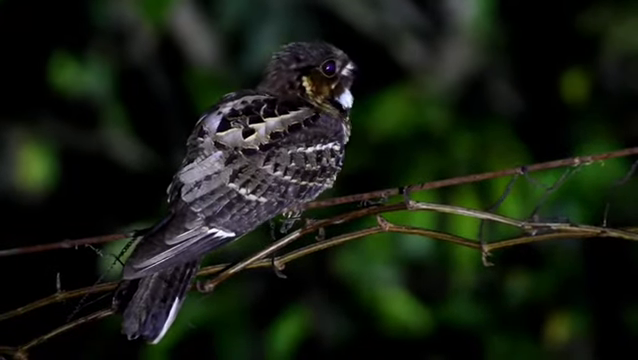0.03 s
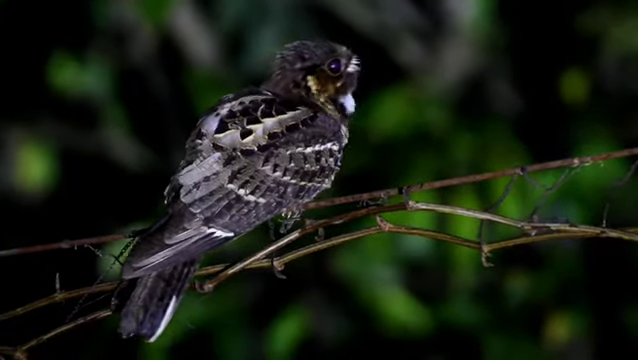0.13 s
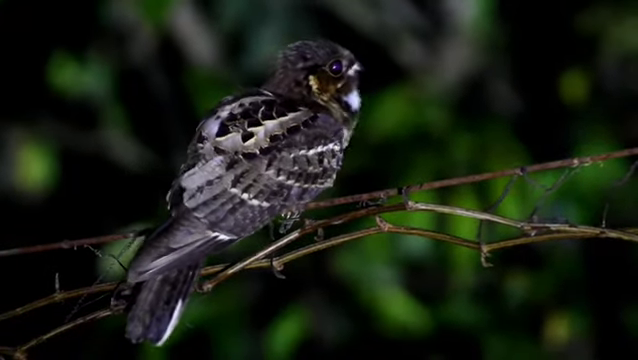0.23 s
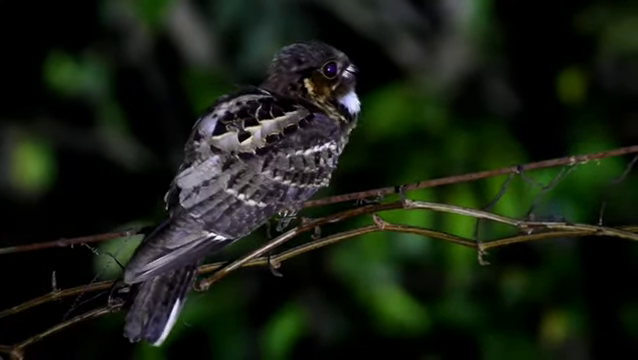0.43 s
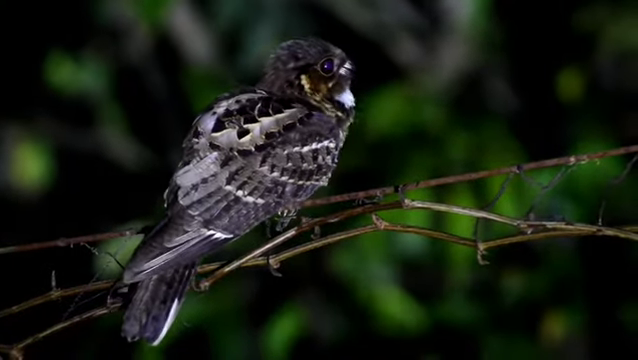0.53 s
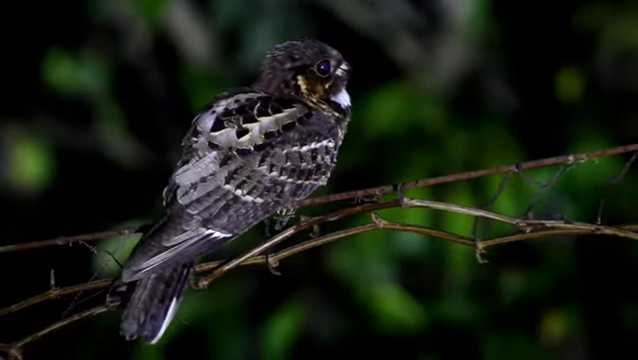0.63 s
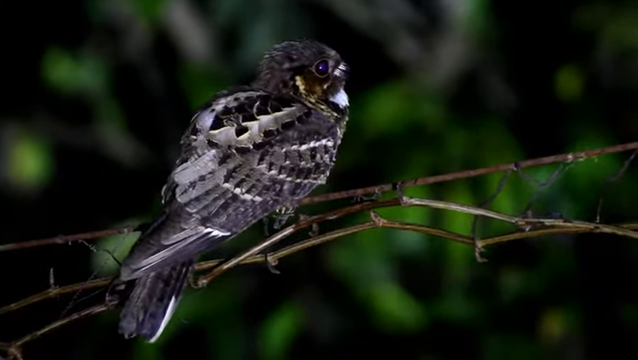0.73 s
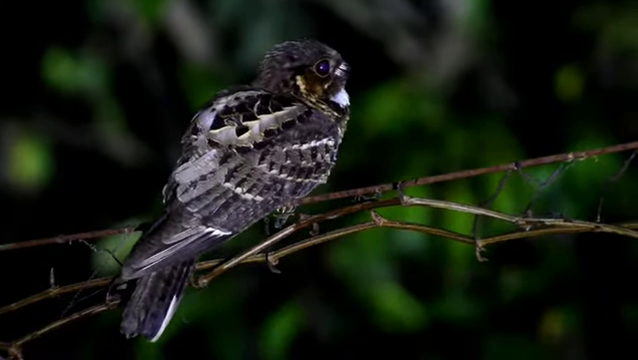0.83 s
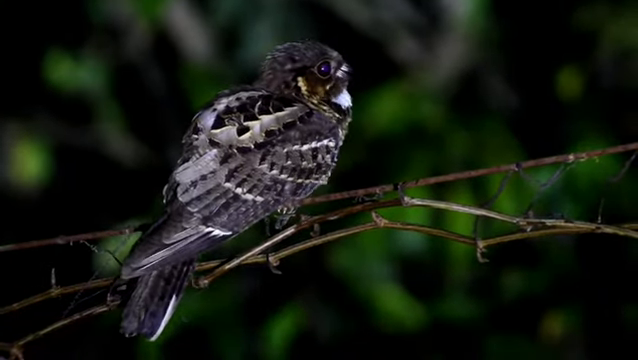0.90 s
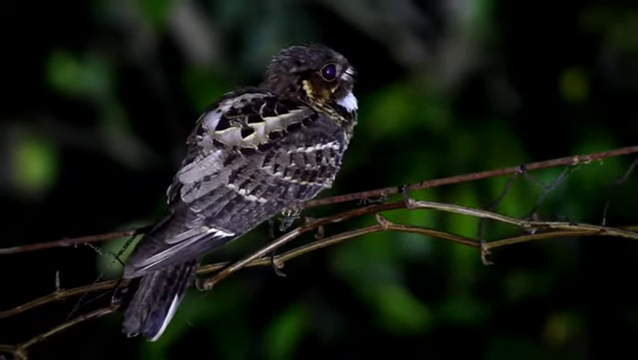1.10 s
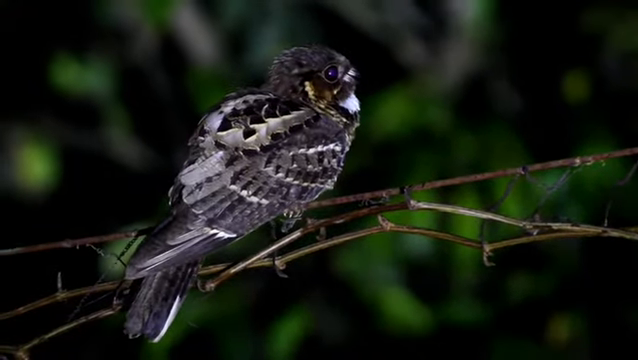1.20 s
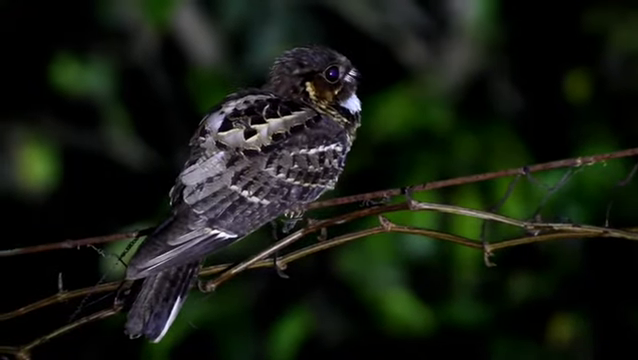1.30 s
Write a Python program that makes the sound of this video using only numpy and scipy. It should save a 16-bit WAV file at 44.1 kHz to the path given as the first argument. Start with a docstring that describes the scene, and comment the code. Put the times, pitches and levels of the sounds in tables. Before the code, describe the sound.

A nightjar on a branch gives one loud whistled note that drops quickly into three weaker wobbling swoops, echoing briefly among trees; high insects buzz and faint crickets trill throughout, with low rumble and microphone hiss.

```python
"""A nightjar gives one quavering whistle at night: a gliding tone with faint overtones rises loudly, then
makes three weaker swoops. Trees return it as delayed copies and a short tail of decaying noise.
Insects buzz in bands of noise, mostly falling in pitch; crickets trill lower, in pulsed noise.
A leaf rustles once, a decaying noise puff. Distant rumble and microphone hiss, shaped noise, lie under all,
with faint steady noise bands and, later, a low wavering hum."""
import sys
import numpy as np
from scipy import signal
from scipy.io import wavfile
from scipy.ndimage import uniform_filter1d

SR = 44100
rng = np.random.default_rng(int(sys.argv[2]) if len(sys.argv) > 2 else 0)


def how_loud(loudness_db):
    """Turn decibels into a plain amplitude multiplier (0 dB gives 1, 20 dB gives 10)."""
    steps = np.asarray(loudness_db, float) / 20
    return 10 ** steps


def transcribe(u):
    """Save the signal u as a 16-bit wav file named by the first command-line argument.

    u: samples, shape (n,) or (channels, n), limited to [-1, 1]; the rate is SR.
    q: integer samples, one column per channel.
    """
    v = np.clip(np.atleast_2d(u).T, -1, 1)
    q = np.round(v * 32767).astype(np.int16)
    wavfile.write(sys.argv[1], SR, q)


N = 59535
T_S = np.arange(N) / SR

# Background spectrum, relative density: f/Hz, level/dB
AIR_SPECTRUM = [(20, -35.5), (35, -13.5), (55, -6.5), (150, -6), (330, -4), (550, -3), (1000, -8),
                (1700, -12.5), (2800, -13), (4300, -11.5), (6600, -58), (7000, -24.5), (7500, -26),
                (8300, -22), (10000, -17), (16000, -20.5)]
# Distant rumble, only its swing about the mean counts: t/s, level/dB
RUMBLE_SWING = [(0.0, -61), (0.499, -61), (0.7, -61.5), (1.35, -60.5)]
# Left-right correlation of the background: f/Hz, correlation/1
AIR_LIKENESS = [(60, 0.46), (150, 0.22), (380, 0.58), (950, 0.073), (2380, -0.22), (5980, 0.029),
                (15000, 0.01)]
# Faint steady noise bands: centre f/Hz, width/Hz, level/dB rms
THIN_BANDS = [(2003, 7, -79.5), (6740, 540, -76.5), (7080, 200, -77.5)]
# Far, blurred chorus: t/s, level/dB rms
FAR_CHORUS_LEVEL = [(1.11, -53), (1.15, -55), (1.19, -51.5)]
# Single insect buzzes: start t/s, length/s, start f/Hz, end f/Hz, level at full swell/dB rms
INSECT_BUZZES = [(-.03, 0.13, 6010, 5444, -47.5), (.09, 0.098, 5290, 5100, -52.5),
                 (0.214, 0.11, 5880, 5550, -48), (0.319, .16, 6140, 5525, -50), (.6, 0.09, 5800, 5600, -50),
                 (0.679, 0.075, 5956, 6000, -48), (0.731, 0.073, 5710, 5550, -48),
                 (0.759, 0.071, 5410, 5074, -51), (0.831, 0.12, 5800, 5490, -50),
                 (0.976, .15, 6100, 5560, -50.5), (1.17, 0.046, 5700, 5870, -50),
                 (1.22, 0.071, 5620, 5450, -45.5), (1.276, 0.08, 5100, 5200, -57),
                 (1.296, 0.12, 6070, 5980, -49.5)]
# Wing strokes in a trill cycle: place/cycle, 1/e half-width of power/cycle, relative level/dB
WING_STROKES = [(.25, 0.069, -6), (0.621, .1, -2)]
# Whistle pitch: t/s, f/Hz
WHISTLE_PITCH = [(.235, 1335), (.241, 1385), (.248, 1422), (.258, 1473), (.266, 1495), (.273, 1500),
                 (.278, 1455), (.285, 1250), (.293, 985), (.302, 790), (.309, 695), (.318, 700),
                 (.327, 870), (.340, 1110), (.350, 1185), (.364, 1260), (.374, 1225), (.381, 1125),
                 (.390, 930), (.402, 735), (.409, 655), (.417, 645), (.427, 820), (.436, 970), (.449, 1130),
                 (.460, 1175), (.470, 1105), (.484, 850), (.495, 680), (.504, 655), (.512, 740),
                 (.519, 820), (.528, 810)]
# Whistle loudness: t/s, level/dB rms
WHISTLE_LEVEL = [(.235, -30), (.240, -27.5), (.247, -31), (.253, -26), (0.266, -23.5), (.277, -21),
                 (0.287, -24), (0.294, -31.5), (.304, -42.5), (0.314, -36), (.336, -44.5), (.356, -49),
                 (.378, -52), (0.39, -41), (.410, -39), (.428, -42), (.448, -48), (.460, -47), (.470, -52),
                 (0.482, -43), (0.498, -43), (.510, -50), (.518, -47), (.524, -51)]
# Overtones: t/s, second level/dB rms, second left over right/dB, third level/dB rms
LOW_OVERTONES = [(.236, -64, 2, -70), (.252, -60, 6, -63), (.266, -68, 9, -62), (.284, -74, 6, -63),
                 (.293, -70, 0, -80), (.310, -86, -4, -95), (.352, -62, -7, -95), (.366, -68, -6, -95),
                 (.377, -64, -8, -95), (.385, -86, 0, -95), (.437, -74, -4, -95), (.456, -66, -5, -95),
                 (.466, -66, -4, -95), (.474, -86, 0, -95)]
# Higher overtones: multiple/1, level over the third/dB
UPPER_OVERTONES = [(5, -12), (7, -9), (8, -10)]
# Near echoes from the trees: delay/s, level/dB, left over right/dB
TREE_ECHOES = [(.0075, -16, -13), (.019, -19.5, 15), (.031, -20, -1.5), (0.044, -16.5, 8.5), (.068, -26, 8),
               (0.097, -21.5, -7.5)]

AIR_DB_RMS, RUMBLE_TOP_HZ = -57.5, 806
AIR_DRIFT_DB, AIR_DRIFT_HZ = 2.05, 4.1
CHORUS_HZ, CHORUS_WIDTH_HZ, CHORUS_TOP_HZ = 5600, 960, 6200
BUZZ_WIDTH_HZ, BUZZ_EDGE_POWER, CHORUS_LEFT_DB = 394, 0.35, 1.3
TRILL_HZ, TRILL_WIDTH_HZ, TRILL_RATE_HZ = 3503, 420, 29
TRILL_DB_RMS, TRILL_LEFT_DB, TRILL_BLUR_DB = -64, 5, -4
RUSTLE_START_S, RUSTLE_DB, RUSTLE_T60_S = 0.098, -55, 0.21
ATTACK_S, RELEASE_S, GLIDE_S = 0.0022, 0.003, 0.004
BIRD_LEFT_LAG_S, BIRD_LEFT_DB, THIRD_LEFT_DB = 0.000025, -0.9, -6
SCATTER_DB, SCATTER_T60_S, SCATTER_RISE_S = -12, 0.84, 0.014
SCATTER_LIKENESS, SCATTER_LOW_CUT_HZ = 0.1, 760
CLUMP_DB, CLUMP_CORNER_HZ = 4, 40
HUM_HZ, HUM_WIDTH_HZ, HUM_START_S, HUM_DB_RMS = 325, 62, 0.61, -70


def rms_one(x):
    """Scale to rms 1."""
    return x / np.sqrt(np.mean(np.abs(x) ** 2) + 1e-20)


def at_hz(points, hz):
    """Interpolate a spectrum on a log frequency axis."""
    points_hz, values = np.transpose(points)
    return np.interp(np.log(hz), np.log(points_hz), values)


def sides(left_db):
    """Left and right gains for a level difference in dB."""
    return how_loud(np.reshape([left_db / 2, -left_db / 2], (2, -1)))


def stereo(mid, side, likeness):
    """Mix two independent noises to a given left-right correlation."""
    return np.sqrt(1 + likeness) * mid + np.sqrt(1 - likeness) * side * [[1], [-1]]


def drift(corner_hz):
    """Slow noise of rms 1: white noise through two equal poles, run at SR / 40."""
    pole = np.exp(-80 * np.pi * corner_hz / SR)
    white = rng.standard_normal(N // 40 + 2002)
    slow = signal.lfilter([1], [1, -2 * pole, pole * pole], white)[2000:]   # settled part
    return np.interp(np.arange(N) / 40, np.arange(len(slow)), rms_one(slow))


def narrow_noise(hz, width_hz):
    """Stereo noise band of rms 1: low-passed complex noise on a carrier that may glide."""
    white = rng.standard_normal((2, N)) + 1j * rng.standard_normal((2, N))
    lowpass = signal.butter(3, width_hz / 2, fs=SR, output="sos")
    carrier = np.exp(2j * np.pi * np.cumsum(hz + 0 * T_S) / SR)
    return rms_one((signal.sosfilt(lowpass, white) * carrier).real)


def air():
    """Rumble and hiss: third-octave noise bands; the low ones swing and drift in level."""
    s, rumble_db = np.transpose(RUMBLE_SWING)
    swing_db = np.interp(T_S, s, rumble_db - rumble_db.mean())
    edges_hz = 20 * 2 ** (np.arange(30) / 3)
    white = rng.standard_normal((2, 2, N + SR // 4))
    out = 0
    for k, (low_hz, high_hz) in enumerate(zip(edges_hz, edges_hz[1:])):
        band = signal.butter(2, [low_hz, high_hz], "band", fs=SR, output="sos")
        mid, side = signal.sosfilt(band, white[k % 2])[:, -N:]   # neighbours use separate noise
        hz = np.sqrt(low_hz * high_hz)
        likeness = np.clip(at_hz(AIR_LIKENESS, hz), -1, 1)
        rumble_share = 1 / (1 + (hz / RUMBLE_TOP_HZ) ** 2)
        moving_db = (swing_db + AIR_DRIFT_DB * drift(AIR_DRIFT_HZ)) * rumble_share
        out = out + how_loud(at_hz(AIR_SPECTRUM, hz) + moving_db) * stereo(mid, side, likeness)
    return how_loud(AIR_DB_RMS) * rms_one(out)


def thin_bands():
    """Faint steady hums and hisses: noise bands of fixed level."""
    return sum(how_loud(db) * narrow_noise(hz, width_hz) for hz, width_hz, db in THIN_BANDS)


def chorus():
    """Insects: gliding noise bands swell and fade over a broader blur."""
    far_db = np.interp(T_S, *np.transpose(FAR_CHORUS_LEVEL))
    out = how_loud(far_db) * narrow_noise(CHORUS_HZ, CHORUS_WIDTH_HZ)
    for start_s, length_s, from_hz, to_hz, db in INSECT_BUZZES:
        share = np.clip((T_S - start_s) / length_s, 0, 1)
        swell = np.abs(np.sin(np.pi * share)) ** BUZZ_EDGE_POWER * (share < 1)
        hz = from_hz + (to_hz - from_hz) * share
        out = out + how_loud(db) * swell * narrow_noise(hz, BUZZ_WIDTH_HZ)
    lowpass = signal.butter(16, CHORUS_TOP_HZ, fs=SR, output="sos")
    return signal.sosfilt(lowpass, out) * sides(CHORUS_LEFT_DB)


def crickets():
    """Noise band pulsed by a weak and a strong wing stroke per cycle, blurred by distance."""
    cycle = T_S * TRILL_RATE_HZ
    power = how_loud(TRILL_BLUR_DB) ** 2   # floor between strokes
    for place, width, db in WING_STROKES:
        offset = (cycle - place + 0.5) % 1 - 0.5
        power = power + how_loud(db) ** 2 * np.exp(-(offset / width) ** 2)
    trill = np.sqrt(power) * narrow_noise(TRILL_HZ, TRILL_WIDTH_HZ)
    return how_loud(TRILL_DB_RMS) * sides(TRILL_LEFT_DB) * rms_one(trill)


def rustle():
    """Leaf: one band-passed noise puff, abrupt start, exponential decay."""
    band = signal.butter(8, (900, 9600), "band", fs=SR, output="sos")
    noise = rms_one(signal.sosfilt(band, rng.standard_normal((2, N))))
    decay_db = -60 * np.maximum(T_S - RUSTLE_START_S, 0) / RUSTLE_T60_S
    return how_loud(RUSTLE_DB + decay_db) * (T_S > RUSTLE_START_S) * noise


def nightjar():
    """A nearly pure gliding tone; its phase-locked second and third overtones lean to varied sides."""
    glide_samples = int(GLIDE_S * SR) | 1
    hz = uniform_filter1d(np.interp(T_S, *np.transpose(WHISTLE_PITCH)), glide_samples)
    db = uniform_filter1d(np.interp(T_S, *np.transpose(WHISTLE_LEVEL)), glide_samples)
    s, *columns = np.transpose(LOW_OVERTONES)
    second_db, second_left_db, third_db = (np.interp(T_S, s, c) for c in columns)
    phase = 2 * np.pi * np.cumsum(hz) / SR
    phase = np.array([np.interp(T_S - BIRD_LEFT_LAG_S, T_S, phase), phase])
    start_s, end_s = WHISTLE_LEVEL[0][0], WHISTLE_LEVEL[-1][0]
    attack = np.clip((T_S - start_s) / ATTACK_S, 0, 1)
    release = np.exp(-np.maximum(T_S - end_s, 0) / RELEASE_S)
    tone = how_loud(db) * sides(BIRD_LEFT_DB) * np.sin(phase)
    tone = tone + how_loud(second_db) * sides(second_left_db) * np.sin(2 * phase)
    tone = tone + how_loud(third_db) * sides(THIRD_LEFT_DB) * np.sin(3 * phase)
    for multiple, rel_db in UPPER_OVERTONES:
        tone = tone + how_loud(third_db + rel_db) * np.sin(multiple * phase)
    return np.sqrt(2) * attack * release * tone   # sine peak from rms


def trees(bird):
    """Discrete near echoes plus convolution with a decaying noise tail."""
    mid, side = rng.standard_normal((2, N))
    tail = stereo(mid, side, SCATTER_LIKENESS)
    tail = tail * how_loud(CLUMP_DB * drift(CLUMP_CORNER_HZ))   # trunks stand in clumps
    tail = tail * how_loud(-60 * T_S / SCATTER_T60_S) * (1 - np.exp(-T_S / SCATTER_RISE_S))
    tail = rms_one(tail) / np.sqrt(N)   # unit energy
    # small leaves scatter low tones less
    highpass = signal.butter(1, SCATTER_LOW_CUT_HZ, "high", fs=SR, output="sos")
    thin = signal.sosfilt(highpass, bird)
    out = how_loud(SCATTER_DB) * signal.fftconvolve(tail, thin[None])[:, :N]
    for delay_s, db, left_db in TREE_ECHOES:
        out = out + how_loud(db) * sides(left_db) * np.interp(T_S - delay_s, T_S, thin)
    return out


def hum():
    """Low hum, equal in both channels: a narrow noise band wavers by itself; 50 ms fade-in."""
    fade = np.clip((T_S - HUM_START_S) * 20, 0, 1)
    return how_loud(HUM_DB_RMS) * fade * narrow_noise(HUM_HZ, HUM_WIDTH_HZ)[0]


def scene():
    """Sum of bird and its echoes, insects, leaf and background."""
    bird = nightjar()
    echoes = trees(bird.mean(axis=0))
    insects = chorus() + crickets()
    leaf = rustle()
    background = air() + thin_bands() + hum()
    return bird + echoes + insects + leaf + background


def low_pass(x):
    """Removes everything above the highest recorded frequency."""
    return signal.sosfilt(signal.butter(12, 16360, fs=SR, output="sos"), x)


def record(dry):
    """Steep low-pass: 60 dB down from 15850 Hz up."""
    lowpass = signal.cheby2(24, 60, 15850, fs=SR, output="sos")
    mix = signal.sosfilt(lowpass, dry)
    return low_pass(mix)


dry = scene()
out = record(dry)
transcribe(out)
```